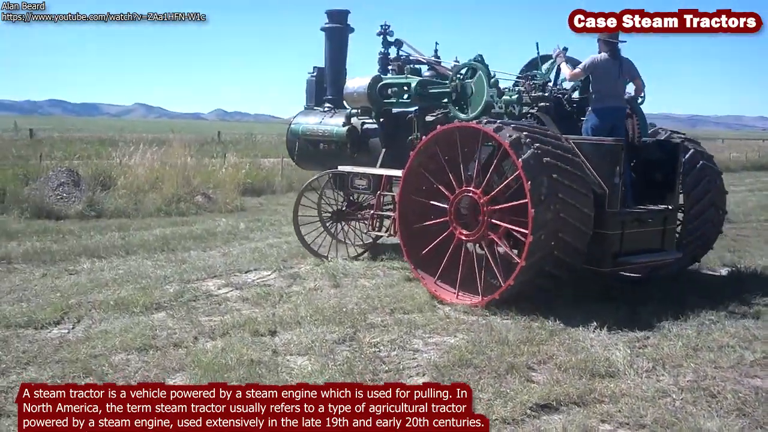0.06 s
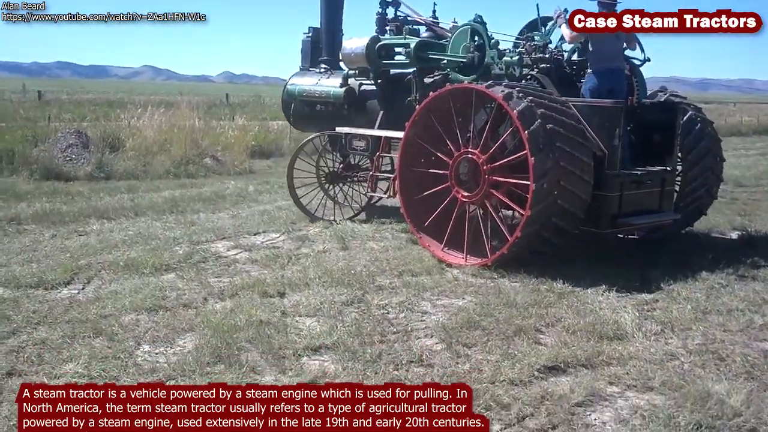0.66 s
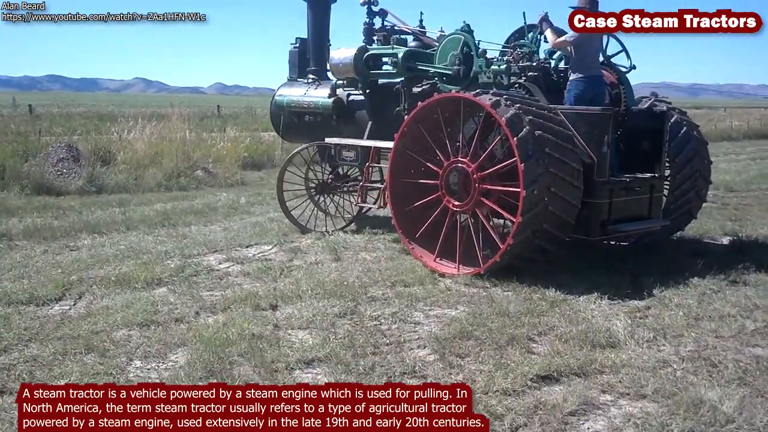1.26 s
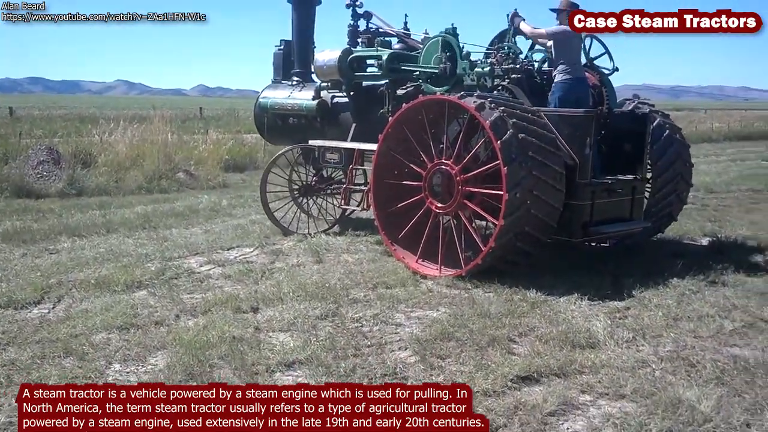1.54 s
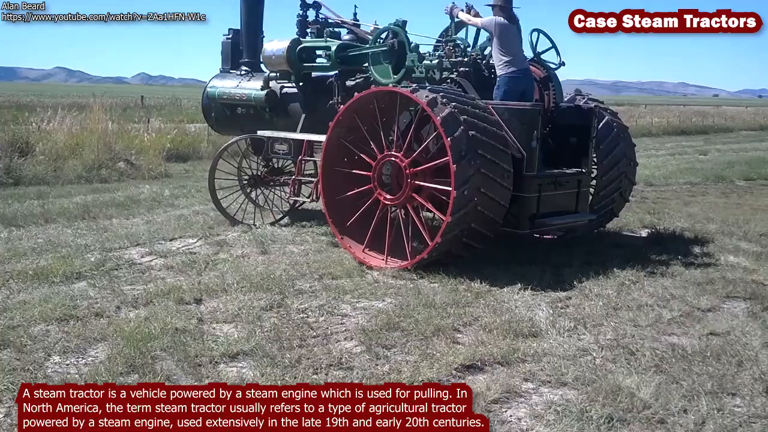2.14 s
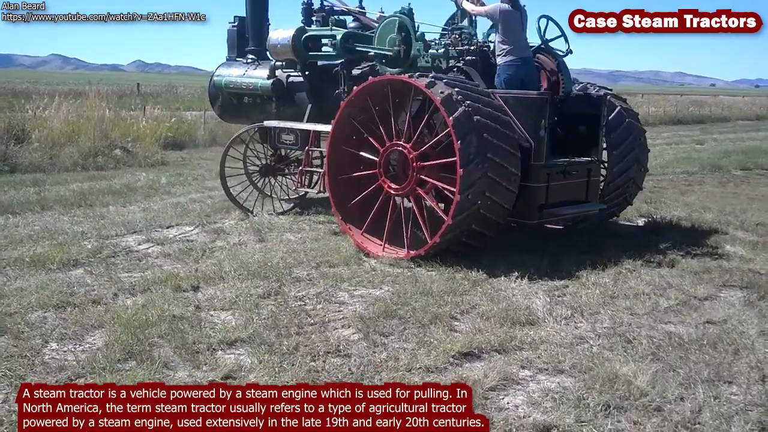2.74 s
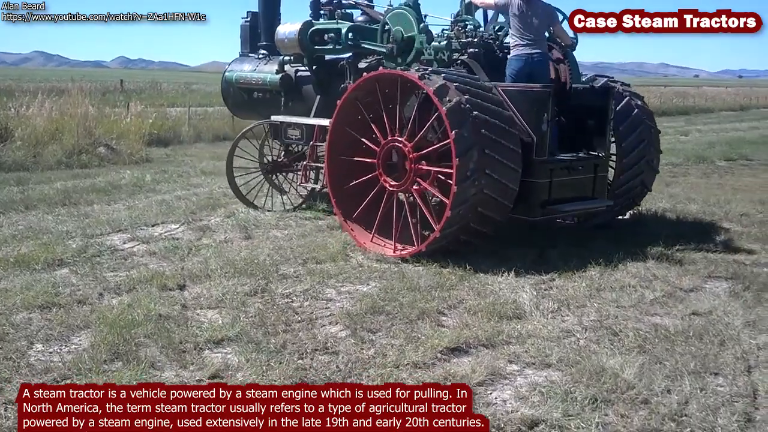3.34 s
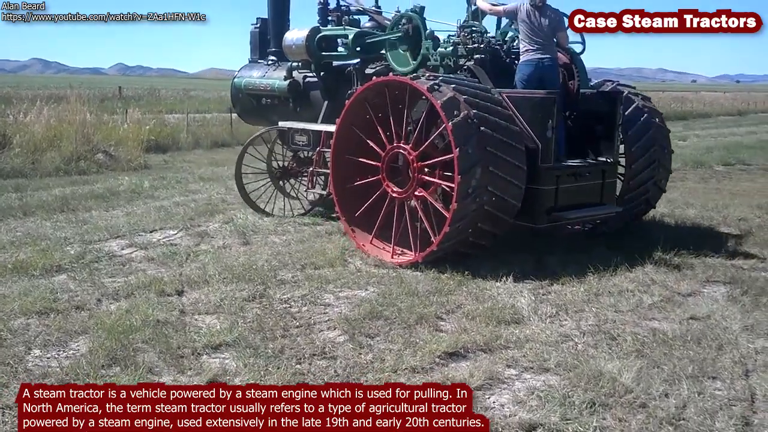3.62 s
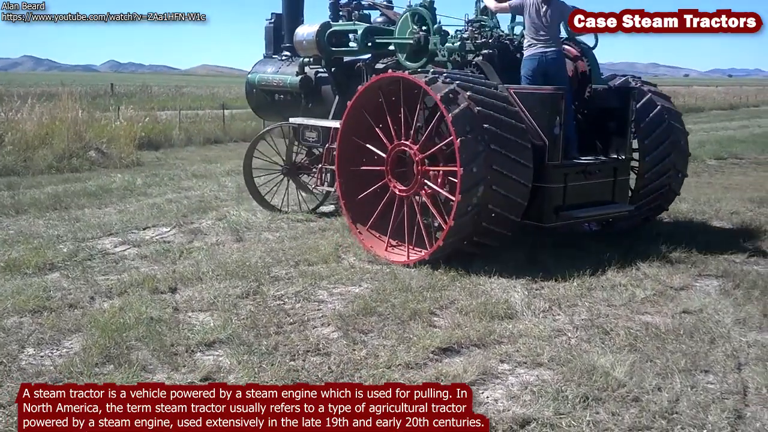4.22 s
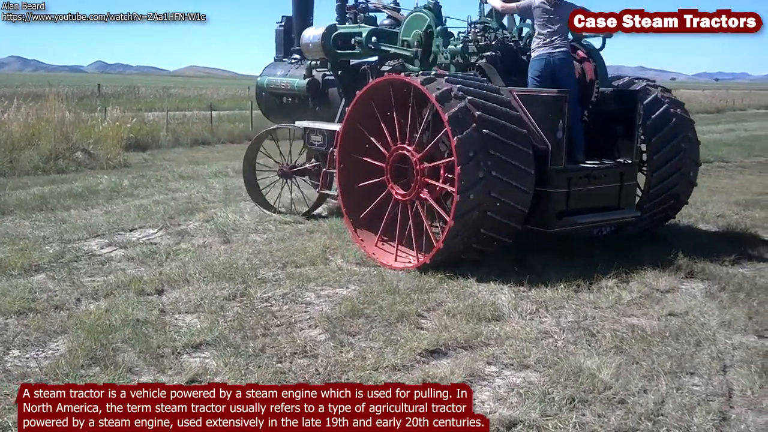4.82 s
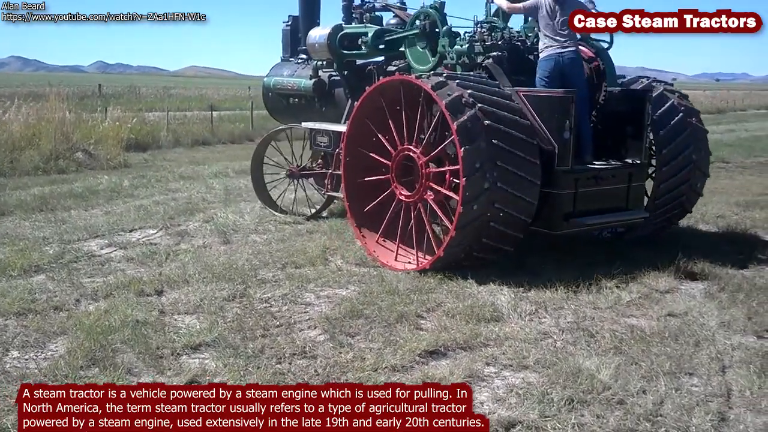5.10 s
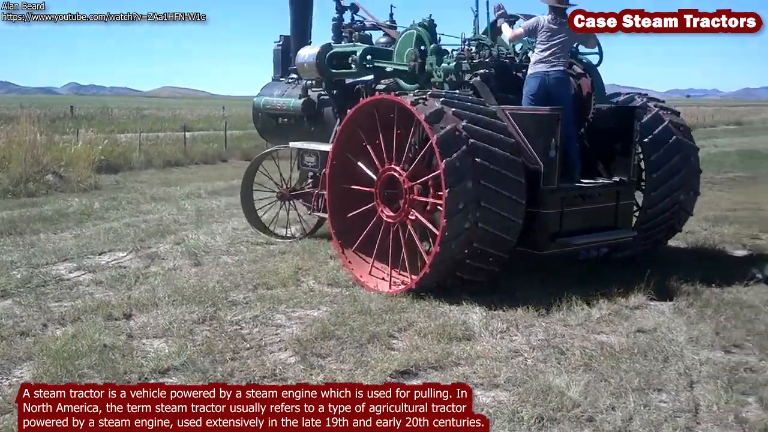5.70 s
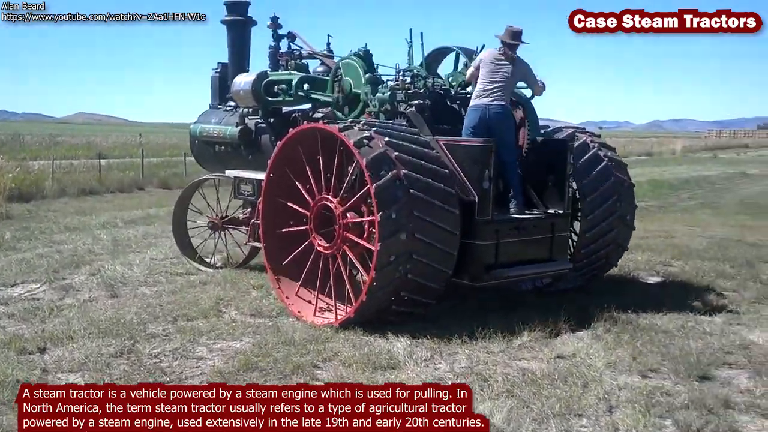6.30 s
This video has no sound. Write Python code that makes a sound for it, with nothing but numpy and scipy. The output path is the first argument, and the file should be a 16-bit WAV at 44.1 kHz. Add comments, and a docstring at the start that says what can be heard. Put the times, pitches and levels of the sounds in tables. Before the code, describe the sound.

An old steam tractor is heard close up in an open field, in wide stereo. For the first second its open iron gears clatter and knock as it slows, and dry bearings give short high squeaks around 0.3 and 0.8 seconds. From about 1 to 2.1 seconds it is almost at rest, with only a faint rattle, light clinks and a low boiler simmer. A short puff of steam and a knock come at 2.2 seconds, then a loud clank at 2.4 as it pulls away. From there to the end the gears clatter and grind in uneven surges, strongest between 3.5 and 5.5 seconds, with hollow drumming, repeated clanks, linkage clinks, brief scrapes and a few tiny squeaks. A little steam hisses near 3.6 and 5.5 seconds. Light wind rumbles and occasionally bumps the microphones, freshening toward the end at about 6.4 seconds.

```python
"""A dry field, close beside a steam traction engine that slows almost to rest, then pulls away with a clank.
Its open iron gears clatter and grind in surges and set the boiler and wheel rims drumming.
Linkage clinks, dry bearings stick and squeak, metal scrapes and a little steam escapes.
Wind nudges the two close microphones, which are cross-fed for a wide stereo image."""
import sys
import numpy as np
from scipy import signal
from scipy.fft import rfft, irfft, next_fast_len
from scipy.io import wavfile
from scipy.ndimage import uniform_filter1d

SR = 44100
rng = np.random.default_rng(int(sys.argv[2]) if len(sys.argv) > 2 else 0)


def inscribe(sig):
    """Save sig as 16-bit PCM at rate SR to the path in sys.argv[1].

    A 1-D sig is mono; a 2-D sig holds one channel per row.
    Samples are clipped to [-1, 1] before scaling.
    """
    pcm = np.round(np.clip(np.atleast_2d(sig).T, -1, 1) * 32767)
    wavfile.write(sys.argv[1], SR, pcm.astype(np.int16))


N = 280462
TIME = np.arange(N) / SR
RING = np.arange(SR // 3) / SR  # time within one blow [s]
FFT_SIZE = 2 * next_fast_len(N // 2 + 2048)
HZ = np.fft.rfftfreq(FFT_SIZE, 1 / SR)
CUTOFF_HZ = 15650


# Close-up tone of the teeth, the hollow body they gain in a surge, the grinding flanks,
# and the boiler and wheel rims: each (frequency [Hz], gain [dB])
TEETH_TONE = [(60, -56), (200, 5), (320, 4.5), (420, -8.5), (700, -1.5), (950, -7), (1250, -13),
              (1700, -20), (2300, -17.5), (3300, -41), (5000, -29), (15000, -44)]
HOLLOW_TONE = [(200, -17), (400, -7), (540, 5.5), (700, 3.5), (1100, -1.5), (1400, -0.5), (1700, 1),
               (2000, -4.5)]
GRIT_TONE = [(300, -26), (1200, 5), (2200, 3.5), (3200, 8.5), (4200, 2.5), (5200, -8.5), (7000, -12),
             (10000, -12), (12500, -28), (15500, -11.5)]
SHELL_TONE = [(25, -19), (60, -19), (95, -4), (160, 3.5), (260, -5), (380, -17), (700, -12.5), (2000, -77)]

def gears(running, surging, grinding, drumming):
    """Close to the microphones, teeth batter each other, dry flanks grind and the big shells drum."""
    teeth = hail(TEETH_TONE, per_s=330, spread_db=-2.5, t60=0.13, crack_db=1.5, ring_db=-2.5)
    grit = hail(GRIT_TONE, per_s=400, spread_db=1.2, t60=0.075, crack_db=-12, ring_db=-1)
    shells = hail(SHELL_TONE, per_s=220, spread_db=0.5, t60=0.13, crack_db=-4.5, ring_db=-2.5)
    extra_load = np.hypot(running, surging) - running
    clatter = teeth * running + colour(teeth, HOLLOW_TONE) * extra_load
    return amp(-6) * clatter + amp(-10) * grit * grinding + amp(4.5) * shells * drumming


# Steady load on the gears as the engine slows, idles and pulls away: (time [s], level [dB])
DRIVE_LOAD = [(0, -28), (0.3, -37), (0.6, -41), (0.78, -47.5), (1.02, -53), (1.2, -57), (1.6, -56),
              (1.95, -54), (2.25, -52), (2.33, -28.5), (2.7, -36), (3.0, -35), (3.3, -36), (3.9, -32),
              (4.45, -35.5), (5.1, -34), (5.7, -34.5), (6.05, -34.5), (6.36, -33)]
# The teeth bear hard: (start [s], hold [s], clatter [dB], grinding [dB], drumming [dB])
LOAD_SURGES = [(-0.03, 0.11, -42, -60, -31), (0.413, 0.17, -45, -40.5, -41),
               (0.873, 0.17, -44.5, -61, -40.5), (2.154, 0.058, -58, -60, -38),
               (2.292, 0.24, -28, -39, -47), (2.785, 0.058, -51, -41, -45), (3.032, 0.045, -28.5, -39, -36),
               (3.484, 0.25, -27, -37.5, -35), (3.716, 0.16, -24.5, -35.5, -35.5),
               (3.94, 0.083, -26, -52, -37), (4.074, 0.17, -29.5, -37, -31),
               (4.699, 0.076, -33, -39.5, -30), (4.811, 0.15, -31.5, -41.5, -31),
               (5.1, 0.11, -40, -37, -56), (5.221, 0.18, -28, -38, -34.5), (5.374, 0.14, -32, -36.5, -47),
               (5.807, 0.18, -29, -63, -33.5), (6.085, 0.13, -29.5, -43, -33.5)]

def gear_load(full_load_db=-36, attack_s=0.039, release_s=0.037):
    """The load sets how loud the gears are: a steady pull plus surges that rise, hold and die away."""
    running = level(DRIVE_LOAD)
    share = running / amp(full_load_db)
    surges = np.zeros((3, N))
    for start, hold, *levels_db in LOAD_SURGES:
        rise = np.clip((TIME - start) / attack_s, 0, 1)
        fall = np.exp(-np.maximum(TIME - start - hold, 0) / release_s)
        surges += amp(levels_db)[:, None] * rise * fall
    surging, grind_surge, drum_surge = surges
    grinding = np.hypot(amp(-43.5) * share ** 0.69, grind_surge)
    drumming = np.hypot(amp(-35.5) * share ** 0.76, drum_surge)
    return running, surging, grinding, drumming


# Modes of the ironwork: (frequency [Hz], level [dB], t60 [s])
IRON_MODES = [(249, -27, 0.45), (337.7, -26.5, 0.75), (1169, -17.5, 0.1), (1422, -7, 0.011),
              (1666, -15.5, 0.059), (2062, -19, 0.21), (4040, -23, 0.061), (4432, -21, 0.12),
              (4640, -20, 0.4), (5938, -5.5, 0.052), (7700, -35, 0.19), (7600, -16.5, 0.27)]

def strike(t60, crack_db, ring_db):
    """One blow on iron: a short crack, a dense dying rattle and the ringing modes."""
    crack = unit(noise(len(RING)) * np.exp(-RING / 0.0003))
    rattle = unit(noise(len(RING)) * decay(t60))
    phases = rng.random((len(IRON_MODES), 2, 1))
    size = 1 + 0.0055 * rng.standard_normal()  # no two parts ring quite alike
    modes = sum(amp(db) * unit(ping(hz / size, mode_t60, phase))
                for (hz, db, mode_t60), phase in zip(IRON_MODES, phases))
    return rattle + amp(crack_db) * crack + amp(ring_db) * modes


def hail(tone, per_s, spread_db, t60, crack_db, ring_db, parts=8):
    """Random impacts shared among several iron parts merge into an even clatter."""
    force = impacts(per_s, spread_db, limit=3.5)
    part_hit = rng.integers(0, parts, N)
    blows = sum(excite(force * (part_hit == k), strike(t60, crack_db, ring_db)) for k in range(parts))
    return steady(colour(blows, tone))


# Heavy blows in the gear train:
# (time [s], level [dB], edge [relative dB], note [Hz], note level [relative dB])
SLACK_BLOWS = [(0.007, -25, -19, 690, 16), (0.537, -16, -15.5, 580, 1), (0.554, -25, -27, 717, 6),
               (0.973, -25, -21, 815, -1), (1.417, -33, -19, 1420, -1), (1.553, -36, -16, 1145, -2),
               (1.748, -39.5, -6, 786, 1), (1.771, -38, -8, 1520, -2), (1.884, -32, -14, 1220, -4),
               (1.924, -33, -24, 1230, -6), (1.954, -38, -26, 873, 7.5), (2.032, -34.5, -15, 1340, 0),
               (2.167, -13, -19, 1674, -9), (2.273, -24.5, -25, 963, 2.5), (2.352, -19, -20, 633, -2),
               (2.398, -4, -41, 737, 0.5), (2.411, -10, -35, 1020, -1), (2.443, -13.5, -35, 808, 0),
               (2.543, -43.5, -30, 530, -2), (2.753, -25, -26, 1490, -2), (2.842, -23, -12, 600, 3),
               (2.893, -21, -20, 1690, -4), (3.011, -24.5, -27, 1144, 3.5), (3.05, -17.5, -29, 814, 0),
               (3.182, -22.5, -12.5, 549, -2), (3.543, -15.5, -17, 552, 3.5), (3.691, -32, -20, 1090, -15),
               (3.753, -33, -21, 665, -1), (3.771, -11.5, -36, 1180, -5), (3.817, -15, -19, 656, -7),
               (3.984, -19, -22, 691, 3.5), (4.096, -17, -30, 1714, 1.5), (4.139, -23, -16, 1147, 8),
               (4.18, -17, -31, 550, 6.5), (4.269, -15, -19, 1140, -12), (4.481, -26.5, -18, 650, 8),
               (4.53, -23.5, -14.5, 654, 2), (4.554, -32, -20, 580, -1), (4.606, -18, -31, 600, -9),
               (4.707, -23.5, -2.5, 1003, 3.5), (4.761, -25, -21, 530, 9), (4.78, -24, -22, 653, 11),
               (4.849, -11.5, -22.5, 570, -17), (4.864, -13, -26, 1316, -17), (4.904, -14.5, -23, 631, 3),
               (4.932, -17.5, -17, 533, 5.5), (4.963, -19, -24, 692, -3), (5.16, -19.5, -27, 850, -13),
               (5.245, -15, -19, 574, 2.5), (5.269, -21, -16, 735, -10), (5.43, -16, -20, 654, -3),
               (5.482, -14, -24, 1370, -10), (5.692, -23, -37, 1170, -6), (5.772, -26, -27, 587, 10.5),
               (5.83, -16, -21, 680, 5.5), (5.865, -17, -26, 692, 10), (5.889, -25, -28, 920, 8),
               (5.924, -26.5, -28, 541, 15), (6.099, -27, -24, 719, -1), (6.155, -33, -20, 810, 0),
               (6.234, -29, -22, 690, -4), (6.339, -23, -30, 1690, -4)]
# Deep body of a blow, heard close: (frequency [Hz], gain [dB])
CLANK_TONE = [(60, -44), (200, 7.5), (400, 8), (750, 5), (1150, -3), (1600, -11), (2500, -13),
              (5000, -32.5), (15000, -57)]

def knocks(light_t60=0.18, firm_db=-22, doubling_db=32, rise_s=0.0034):
    """Slack closes in the gears: a deep clank with a hard edge and the note of the part that is hit."""
    out = np.zeros((2, N))
    swing = np.minimum(RING / rise_s, 1)
    for start, db, edge_db, hz, note_db in SLACK_BLOWS:
        t60 = light_t60 * 2 ** (max(db - firm_db, 0) / doubling_db)  # firm blows ring longer
        body = peaked(colour(strike(t60, crack_db=-16, ring_db=-1), CLANK_TONE))
        edge = peaked(colour(strike(t60 * 0.79, crack_db=-23, ring_db=-9.5), GRIT_TONE))
        note = amp(note_db) * ping(hz, t60=0.1)
        add(out, start, amp(db - 12.5) * (swing * (body + note) + amp(edge_db + 3) * edge))
    return out


def loose_parts(clatter, grinding):
    """Pins and grit jingle in the teeth; spokes and plates clonk as the gears shake them."""
    jingle = taps(per_s=220, spread_db=1.2, t60=0.04, low_hz=1300, high_hz=3900, tilt=-0.7)
    clonks = taps(per_s=70, spread_db=1, t60=0.1, low_hz=280, high_hz=1000, tilt=-1.2)
    return amp(-13) * jingle * grinding + amp(-10) * clonks * clatter


def taps(per_s, spread_db, t60, low_hz, high_hz, tilt, parts=28, rise_s=0.011):
    """Random taps on loose parts that ring briefly, each at its own pitch."""
    force = impacts(per_s, spread_db)
    notes = np.geomspace(low_hz, high_hz, parts) * rng.uniform(0.93, 1.03, parts)
    swell = 1 - np.exp(-RING / rise_s)
    rings = [hz ** tilt * ping(hz, t60, rng.random((2, 1))) * swell for hz in notes]
    part_hit = rng.integers(0, parts, N)
    out = np.zeros((2, N))
    for at in np.flatnonzero(force):
        add(out, at / SR, force[at] * rings[part_hit[at]])
    return unit(out)


# Light blows in the linkage:
# (time [s], level [dB], top octave [relative dB], note [Hz], rattle t60 [s], hardness [0-1])
LINKAGE_BLOWS = [(0.472, -40.5, -7, 2000, 0.07, 0.3), (0.632, -53.5, 7, 3350, 0.027, 0.95),
                 (0.89, -36, -7, 3640, 0.1, 0.36), (1.283, -52, -4, 3950, 0.071, 0.3),
                 (1.4158, -54, -19, 1880, .08, .4), (1.524, -50, -7, 3370, 0.22, 0.85),
                 (1.595, -56, -20, 1940, .08, .3), (1.654, -49.5, -1, 2130, .06, 0.6),
                 (1.6761, -46.5, -22, 4080, 0.16, 0.5), (1.761, -47.5, -26, 3220, 0.092, .4),
                 (1.88, -47, -26, 2020, 0.065, 0.3), (1.919, -47, -20, 4700, 0.051, 0.3),
                 (2.033, -52.5, 3, 3700, 0.047, .6), (2.165, -34, 2, 3950, 0.14, 0.2),
                 (2.178, -40, 6, 4610, 0.046, 0.7), (2.882, -37.5, -6, 4470, 0.23, 0.1),
                 (3.048, -35, 0.5, 2120, 0.09, 0.3), (3.154, -38, -5.5, 4040, 0.23, .4),
                 (3.366, -32.5, -5, 3450, 0.074, 0.94), (3.499, -36.5, -1, 4180, .08, 0.5),
                 (3.519, -35.5, 0, 4050, 0.11, .6), (3.549, -34, -16, 4060, 0.082, 0.5),
                 (3.584, -30.5, -4, 4060, 0.41, 0.1), (3.6854, -30, -6, 2130, 0.14, 0.3),
                 (3.754, -43, -1, 4330, .05, 0.7), (3.974, -35, -2, 6370, 0.097, 0.3),
                 (3.992, -37.5, 0, 3970, 0.17, 0.4), (4.2717, -31, -0.5, 1975, 0.15, 0.96),
                 (4.6, -41.5, -7, 4000, .06, 0.7), (4.7058, -37, -20, 3730, .09, 0.8),
                 (4.91, -43, -20, 4200, .06, 0.3), (5.041, -42, -6, 3900, 0.19, 0.5),
                 (5.2596, -36, -31, 3970, 0.14, 0.1), (5.324, -36.5, -4, 2060, 0.12, .4),
                 (6.128, -38.5, 1.5, 2050, 0.31, 0.6), (6.181, -39.5, -12, 4040, .06, 0.6)]
# Body and top octave of a clink, heard close: each (frequency [Hz], gain [dB])
LINK_TONE = [(300, -55), (900, 4), (1600, 5), (2300, 10.5), (3400, 11.5), (5000, 4), (7500, -4),
             (10000, -10), (15000, -54)]
TOP_TONE = [(4000, -8), (8000, 4.5), (15000, -7)]

def clinks(soft_rise_s=0.0035, tick_s=0.00059):
    """Rods, pins and steering chains tap; square hits start with a tick, glancing ones swell."""
    out = np.zeros((2, N))
    for start, db, top_db, hz, t60, hardness in LINKAGE_BLOWS:
        rise = np.minimum(RING / (soft_rise_s * (1 - hardness)), 1)
        attack = rise * (1 + hardness ** 2 * np.exp(-RING / tick_s))
        body = peaked(attack * colour(strike(t60, crack_db=-31, ring_db=-0.5), LINK_TONE))
        top = peaked(attack * colour(strike(t60 * 0.77, crack_db=-38, ring_db=-12), TOP_TONE))
        note = amp(-3) * ping(hz, t60=0.11)
        add(out, start, amp(db - 5.5) * (body + note + amp(top_db - 3.5) * top))
    return out


# Dry bearings: (start [s], length [s], pitch [Hz], bend [Hz], level [dB], swell [dB], opening
# overtones [relative dB], rasp [relative dB], midway chatter depth [rad], roughness [0-1])
BEARING_SQUEAKS = [(0.227, 0.05, 4420, 0, -56, -4, -25, -9, 0, 1),
                   (0.322, 0.13, 2000, 110.5, -38, 2.5, 7, -7, 0.33, 0.3),
                   (0.328, .04, 7690, 0, -50, -2, -30, -22, 0, .3),
                   (0.335, 0.051, 6110, 0, -49, -5, -30, -20, 0, 0),
                   (0.349, 0.068, 4930, 3, -47, 3, -30, -14, 0, 0.05),
                   (0.376, 0.037, 6940, 120, -55, -3, -30, -10, 0, 0.4),
                   (0.365, 0.14, 779, -2, -40.5, 1.5, -6, -27, 0.056, 0.25),
                   (0.568, 0.055, 4460, 42, -52, 0, -30, -22, 0.84, 0.2),
                   (0.598, 0.051, 3330, 0, -50, 2, -30, -22, 0, .08),
                   (0.67, 0.11, 4450, 6, -59, 4.5, -30, -3, 0, 0.25),
                   (0.763, 0.068, 2063, 24, -32.5, 5, 2.5, -12, 0.15, 0.14),
                   (0.763, 0.043, 6140, -3, -46, -2, -30, -25, 0, .05),
                   (0.799, 0.068, 1690, 21, -43, 8, -8, -6, 0.26, 0.14),
                   (0.808, 0.071, 832, -2, -52.5, -9, -7, -22, 0, 0.3),
                   (1.258, 0.052, 1390, -58, -54, 4, -20, -22, 0.2, 0.22),
                   (1.388, 0.017, 1360, 0, -56.5, 4, -20, -25, 0, 0.1),
                   (2.055, 0.056, 366, 0, -45, 2, -24, -34, 0, 0),
                   (4.171, 0.019, 4070, 0, -39, -5.5, 1, -8.5, 0.2, 0.3),
                   (4.263, 0.011, 2020, 0, -36, 0, 14, -23, 0, 0.2),
                   (4.309, 0.033, 2030, -6, -43.5, -0.5, 17, -7, 0.024, 0.3),
                   (5.345, 0.061, 4432, -7, -50, -1, -30, -12, 0.2, 0.33),
                   (5.42, 0.051, 7091, -2, -52, 0, -30, -6, 0, 0.4),
                   (6.147, 0.036, 2000, 6, -43.5, -7, -9, -8, 0.3, 0.5),
                   (6.215, 0.02, 2170, 0, -41, -1, -14, -9, 0.084, 0.9)]
# Overtones of a squeak: (multiple of the pitch, level [dB])
SQUEAK_OVERTONES = [(2, -8), (3, -11.5), (4, -22), (5, -19), (6, -26)]

def squeaks(chatter_hz=785, waver_hz=70, edge_s=0.01, overtone_fade_db=21, rasp_growth_db=5):
    """Bearings stick and slip: tones start locked and bright, then bend and break into chatter and rasp."""
    rasp_tone = [(1000, -27), (2200, 11), (4300, 9), (5000, 7), (7500, 2), (10000, -6), (14000, -43)]
    out = np.zeros((2, N))
    for start, length, hz, bend_hz, db, swell_db, overtone_db, rasp_db, depth, rough in BEARING_SQUEAKS:
        t = np.arange(int(length * SR)) / SR
        along = t / length
        speed, pressure = unit(uniform_filter1d(noise(SR), 110, axis=1))[:, :len(t)]
        chatter_turns = np.cumsum(chatter_hz * (1 + 0.25 * pressure)) / SR
        chatter_rad = 2 * along * depth * sine(chatter_turns)
        pitch = hz + bend_hz * along + waver_hz * rough * (0.5 + along) * speed
        turns = np.cumsum(pitch) / SR + chatter_rad / (2 * np.pi)
        overtones = sum(amp(part_db) * sine(k * turns)
                        for k, part_db in SQUEAK_OVERTONES if k * hz < CUTOFF_HZ)
        tone = sine(turns) + amp(overtone_db - overtone_fade_db * along) * overtones
        tone = unit(tone * (1 - rough + rough * pressure))
        slips = noise(SR)[:, :len(t)] * np.exp(-(turns % 1) / 0.33)  # one burst a cycle
        rasp = amp(rasp_db + rasp_growth_db * (along - 0.5)) * unit(colour(slips, rasp_tone))
        fades = signal.windows.tukey(len(t), min(2 * edge_s / length, 0.7))
        add(out, start, amp(db + 1 + swell_db * (along - 1)) * (tone + rasp) * fades)
    echoes = noise(len(RING)) * decay(t60=0.16)  # scattered by the wheels and boiler
    return out + amp(-10) * excite(out, echoes / np.linalg.norm(echoes[0]))


# Dry metal drags over metal: (start [s], length [s], level [dB])
DRAGS = [(0.563, 0.44, -56), (3.439, 0.056, -48.5), (3.553, .1, -38.5), (3.657, 0.051, -43),
         (4.1, 0.098, -52), (5.25, 0.17, -56), (5.398, 0.096, -38.5), (6.13, 0.15, -53)]
# Modes of the dragging parts: (frequency [Hz], level [dB], t60 [s])
DRAG_MODES = [(2000, 8, 0.077), (2330, 0, .03), (3330, 5.5, 0.24), (3560, 6.5, 0.11), (4060, 5, 0.076),
              (4496, -4, 0.098), (6040, -2, 0.029), (7900, 1, 0.046), (7690, -21, .04),
              (9600, -12.5, 0.018), (9700, -28, 0.025), (12100, -9, .01)]

def scrapes(detune=0.014, spots=4):
    """Rough faces catch and let go; every slip snaps and rings one of a few spots on the metal."""
    pressure = np.zeros((1, N))
    for start, length, db in DRAGS:
        add(pressure, start, amp(db) * signal.windows.tukey(int(length * SR), 0.5))
    force = impacts(per_s=300, spread_db=1.5)
    spot_hit = rng.integers(0, spots, N)
    out = np.zeros((2, N))
    for k in range(spots):
        ring = 0
        for hz, db, t60 in DRAG_MODES:
            spot_hz = hz * (1 + detune * rng.standard_normal())
            ring += amp(db) * unit(ping(spot_hz, t60, rng.random((2, 1))))
        snap = unit(colour(noise(len(RING)) * np.exp(-RING / 0.0015), GRIT_TONE))
        out += excite(force * (spot_hit == k), unit(ring) + amp(-10) * snap)
    return steady(out) * pressure


# Escaping steam: (peak time [s], rise [s], fall [s], level [dB], thin hiss [relative dB])
STEAM_PUFFS = [(2.176, 0.018, 0.0086, -24.5, -25), (2.52, 0.036, 0.024, -35, -25),
               (2.63, 0.011, 0.018, -39.5, -25), (3.61, 0.16, 0.067, -40, -15),
               (5.46, 0.034, 0.047, -33.5, 1), (5.58, 0.05, 0.07, -46.5, 4),
               (5.82, 0.021, 0.014, -37.5, -20)]
# Jet, thin hiss and simmering boiler, heard close: each (frequency [Hz], gain [dB])
JET_TONE = [(500, 11), (2000, 4), (3500, 13), (6000, 14.5), (9000, 6), (12000, 4.4), (15500, 10)]
HISS_TONE = [(5000, -35), (10000, -10), (12500, 0), (15500, 3)]
SIMMER_TONE = [(25, -37), (130, 19.5), (300, -19), (700, -3), (1400, -13), (2000, -40), (3100, -36),
               (4000, -31), (5400, -21.5), (7000, -25), (12000, -24.5), (15500, -21.5)]

def steam():
    """Short jets of steam over the boiler's steady simmer; a narrow gap adds a thin, very high hiss."""
    jet_flow, hiss_flow = np.zeros((2, N))
    for peak, rise, fall, db, hiss_db in STEAM_PUFFS:
        flow = amp(db) * np.exp(-np.maximum((peak - TIME) / rise, (TIME - peak) / fall))
        jet_flow += flow
        hiss_flow += amp(hiss_db) * flow
    jet, hiss, simmer = (unit(colour(noise(), tone)) for tone in (JET_TONE, HISS_TONE, SIMMER_TONE))
    return amp(-8.5) * (jet_flow * jet + hiss_flow * hiss) + amp(-50) * simmer


# The breeze over the field eases, then freshens: (time [s], level [dB])
FIELD_BREEZE = [(0, -47), (1.5, -54), (2.6, -55), (4.3, -48), (6.36, -40.5)]
# Buffets right on the microphones: (time [s], length [s], level [dB])
MIC_BUFFETS = [(0.662, 0.013, -19.5), (1.033, 0.035, -33), (1.328, 0.048, -38), (1.702, 0.018, -24.5),
               (4.942, 0.062, -25), (5.165, 0.17, -31), (5.975, 0.17, -38)]
# Wind rumble at the microphones: (frequency [Hz], gain [dB])
WIND_TONE = [(25, -68), (70, 4), (130, 14), (200, 3.5), (320, -13), (600, -39), (2000, -58)]

def wind():
    """Eddies swirl between the microphones, so they show mostly in the difference."""
    buffets = sum(amp(db) * np.exp(-2 * ((TIME - at) / length) ** 2) for at, length, db in MIC_BUFFETS)
    eddies = colour(noise(), WIND_TONE)
    eddies /= np.sqrt(uniform_filter1d(eddies ** 2, SR // 30, axis=1))
    return amp(-3.5) * (level(FIELD_BREEZE) + buffets) * eddies * amp([[-9], [0]])


def amp(db):
    """Decibels to gain."""
    return 10 ** (np.asarray(db) / 20)


def unit(x):
    """Scales to rms 1."""
    return x / np.sqrt(np.mean(x ** 2) + 1e-20)


def peaked(blow):
    """Scales a blow so that its first 8 ms have rms 1."""
    return blow / np.sqrt(np.mean(blow[:, :SR // 125] ** 2))


def steady(x):
    """Holds the slow level near 1 and keeps the single impacts."""
    return x / np.sqrt(uniform_filter1d(x[0] ** 2, SR // 12) + 1e-4 * np.mean(x ** 2))


def level(table):
    """A (time [s], level [dB]) curve as a gain for every sample."""
    return amp(np.interp(TIME, *np.transpose(table)))


def curve(table, hz):
    """Reads a (frequency [Hz], value) table on a log-frequency axis."""
    table_hz, value = np.transpose(table)
    return np.interp(np.log(hz + 1), np.log(table_hz), value)


def colour(x, tone):
    """Causal, minimum-phase filter through (frequency [Hz], gain [dB]) points."""
    size = next_fast_len(x.shape[-1] // 2 + 2048) * 2
    cepstrum = irfft(np.log(amp(curve(tone, np.fft.rfftfreq(size, 1 / SR)))))
    cepstrum[1:size // 2] *= 2
    cepstrum[size // 2 + 1:] = 0
    return irfft(rfft(x, size) * np.exp(rfft(cepstrum)))[..., :x.shape[-1]]


def noise(size=N):
    """White noise as the microphones' sum and difference."""
    return rng.standard_normal((2, size))


def sine(turns):
    """Sine of a phase given in cycles."""
    return np.sin(2 * np.pi * turns)


def decay(t60):
    """Falls 60 dB in t60 seconds."""
    return amp(-60 * RING / t60)


def ping(hz, t60, phase=0):
    """One mode ringing down."""
    return sine(hz * RING + phase) * decay(t60)


def impacts(per_s, spread_db, limit=3):
    """Impulses at random times and of uneven force."""
    force = amp(spread_db * np.minimum(rng.exponential(1, N), limit))
    return force * (rng.random(N) < per_s / SR)


def excite(force, response):
    """Drives a two-channel impulse response with a signal."""
    return signal.oaconvolve(np.atleast_2d(force), response, axes=1)[:, :N]


def add(mix, start, sound):
    """Mixes a sound in at start seconds."""
    part = mix[:, max(round(start * SR), 0):][:, :sound.shape[-1]]
    part += sound[..., :part.shape[1]]


# Echoes off ground and wheels reach the microphones unevenly:
# (frequency [Hz], likeness of difference and sum [-1 to 1])
PAIR_LIKENESS = [(100, 1), (300, -0.99), (420, 0.021), (560, 0.98), (690, 0), (800, -.75), (980, -0.13),
                 (1170, 0.47), (1650, -0.059), (1950, -0.38), (2500, -0.16), (3500, -0.23), (5000, -0.19),
                 (7000, -0.23)]
# Width of the engine at the pair: (frequency [Hz], difference against sum [dB])
PAIR_WIDTH = [(40, -15), (150, -29), (350, -8), (500, -4.5), (700, -24.5), (1000, -2.5), (1400, -14),
              (1800, 5.5), (2080, -6.5), (2400, 5.5), (3000, 1.5), (15000, -1)]

def scene():
    """Engine and wind at two close microphones, built as sum and difference, returned as left and right."""
    running, surging, grinding, drumming = gear_load()
    engine = gears(running, surging, grinding, drumming)
    engine += loose_parts(np.hypot(running, surging), grinding)
    engine += knocks() + clinks() + squeaks() + scrapes() + steam()
    mid_bins, side_bins = rfft(engine, FFT_SIZE)
    likeness = curve(PAIR_LIKENESS, HZ)
    side_bins = likeness * mid_bins + np.sqrt(1 - likeness ** 2) * side_bins
    engine[1] = irfft(side_bins * amp(curve(PAIR_WIDTH, HZ)), FFT_SIZE)[:N]
    mid, side = engine + wind()
    return np.array([mid + side, mid - side])


# Balance of the microphone pair: (frequency [Hz], left against right [dB])
PAIR_BALANCE = [(150, 1), (250, 3.5), (410, 7.5), (640, 1), (980, 5), (1300, 0), (1500, -1), (1760, -7),
                (1950, 1), (2200, -4), (2700, 0)]

def record(dry, crossfeed=0.975, delay_s=0.000359):
    """Widens the pair by taking from each side a late copy of the other, then colours and band-limits it."""
    channels = rfft(dry, FFT_SIZE)
    late_opposite = channels[::-1] * np.exp(-2j * np.pi * HZ * delay_s)
    balance = amp(curve(PAIR_BALANCE, HZ) * [[0.5], [-0.5]])
    wide = irfft((channels - crossfeed * late_opposite) * balance, FFT_SIZE)[:, :N]
    lowpass = signal.firwin(511, CUTOFF_HZ, window=("kaiser", 9), fs=SR)
    return signal.oaconvolve(wide, lowpass[None], "same")


dry = scene()
out = record(dry)
inscribe(out)
```